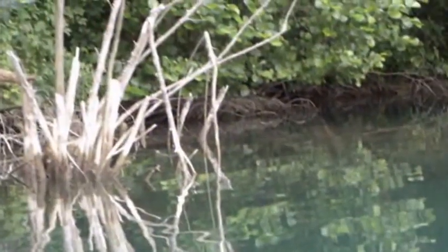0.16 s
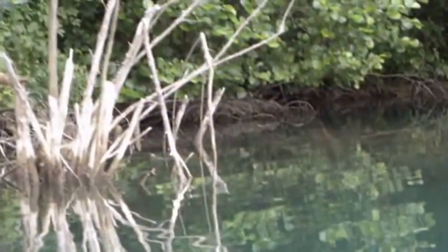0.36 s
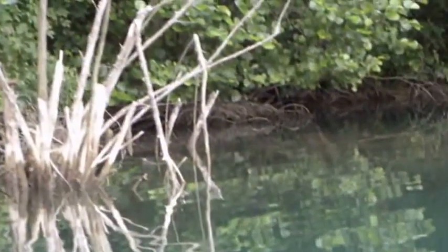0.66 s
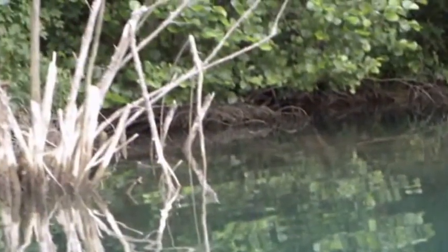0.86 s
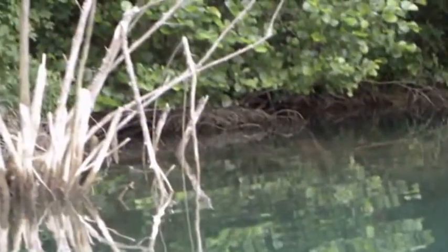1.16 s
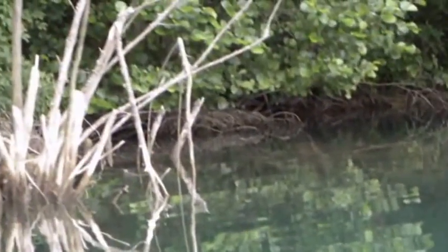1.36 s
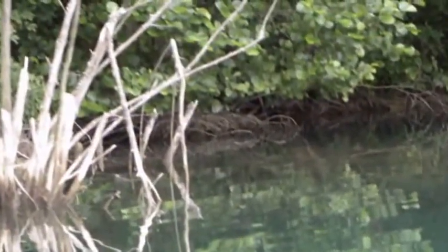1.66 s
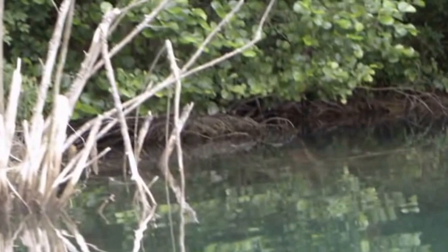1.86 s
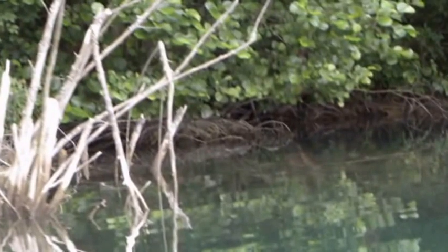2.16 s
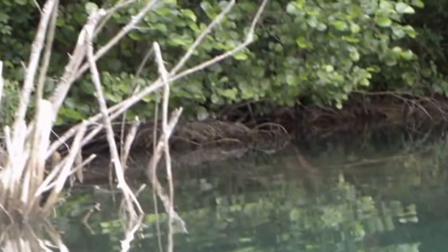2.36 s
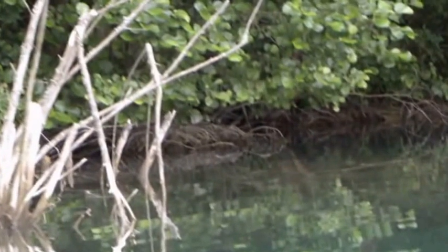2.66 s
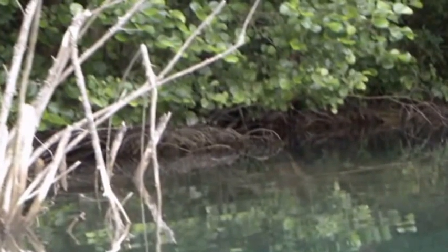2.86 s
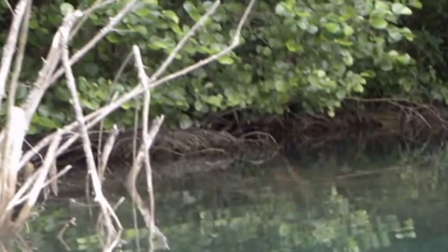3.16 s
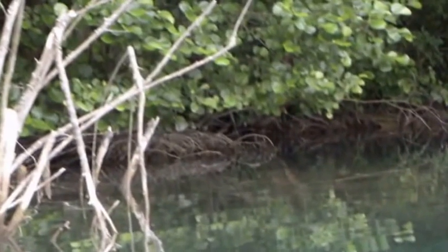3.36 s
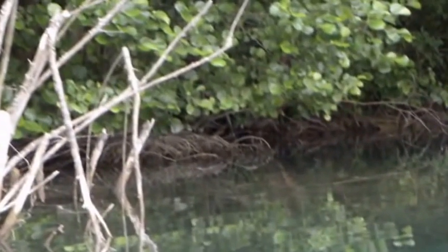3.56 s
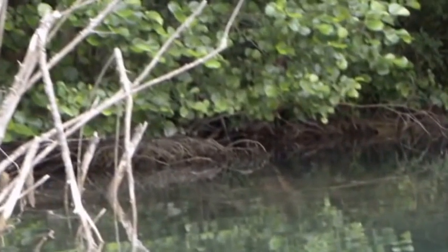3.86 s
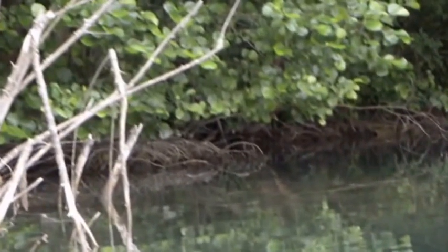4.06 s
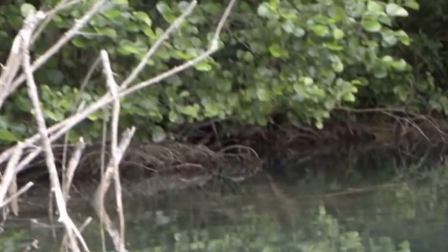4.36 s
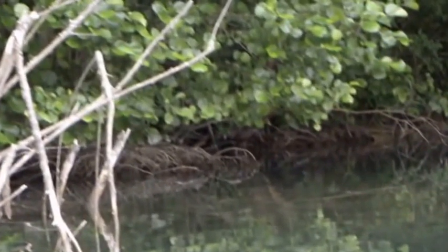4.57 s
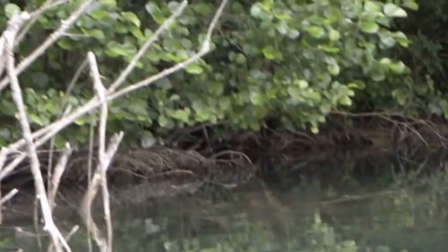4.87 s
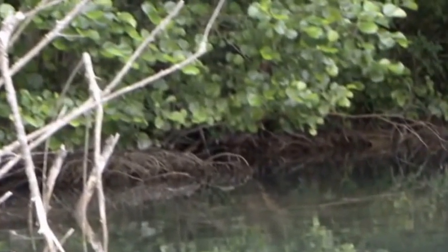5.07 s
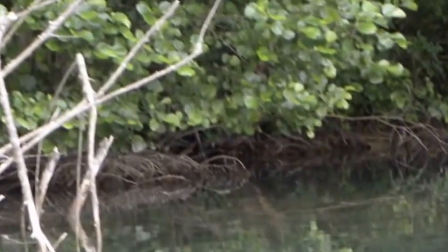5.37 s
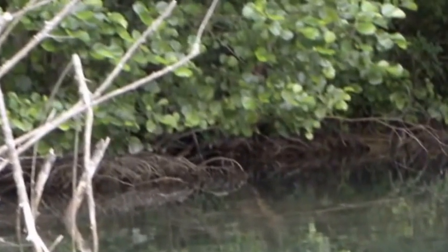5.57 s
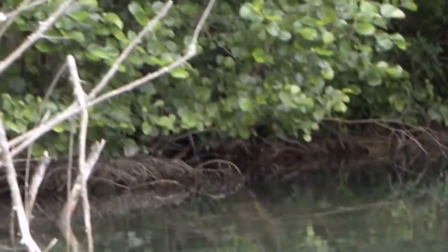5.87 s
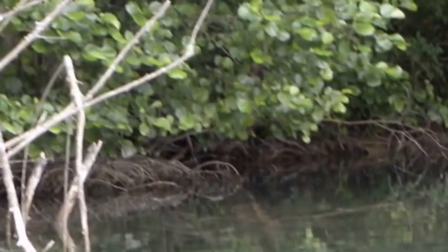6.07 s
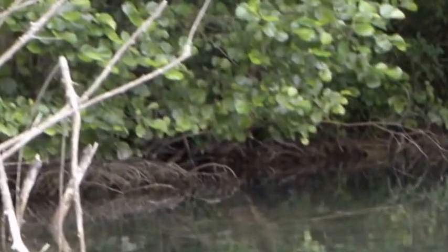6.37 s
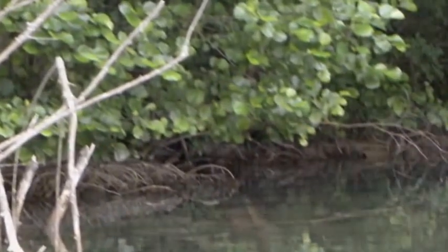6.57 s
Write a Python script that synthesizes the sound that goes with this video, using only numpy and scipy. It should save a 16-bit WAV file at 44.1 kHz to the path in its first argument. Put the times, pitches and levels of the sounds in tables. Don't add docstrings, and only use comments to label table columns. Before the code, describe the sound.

At a still, leafy waterside, several small frogs trade short creaking trills, mostly from the left, each slowing and rising slightly, over a steady far chorus. Thin bird chips tick on the left. Midway a thrush gives clear fluted whistles, then a warbler on the right repeats a fast sweeping phrase. Faint distant birds, an insect haze and soft microphone hiss lie behind.

```python
import sys
import numpy as np
from scipy import signal
from scipy.fft import rfft, irfft, next_fast_len
from scipy.io import wavfile
from scipy.ndimage import uniform_filter1d, map_coordinates

SR = 44100
rng = np.random.default_rng(int(sys.argv[2]) if len(sys.argv) > 2 else 0)


def field_ratio(decibels):
    return 10 ** (np.asarray(decibels, dtype=float) / 20)


def to_wav(sig):
    pcm = np.clip(np.atleast_2d(sig), -1, 1) * 32767
    pcm = np.round(pcm).astype(np.int16)
    wavfile.write(sys.argv[1], SR, pcm.T)


N = 296793


def along(points, hz):
    f, v = np.transpose(points)
    return np.interp(np.log(hz + 1), np.log(f + 1), v)


def panned(x, pan_db, lag=0):
    left = np.roll(x, lag) * field_ratio(pan_db / 2)
    right = x * field_ratio(-pan_db / 2)
    return np.array([left, right])


def air():
    # f/Hz, density/dB per Hz
    air_spectrum = [(20, -20.5), (60, -31), (124, -37.5), (219, -36), (489, -21.5), (908, -24), (1400, -6),
                    (2140, -16), (3670, -22.5), (5500, -30), (7000, -29.5), (11300, -36), (12100, -46.5),
                    (12250, -77.5)]
    # f/Hz, left-right correlation
    coherence = [(60, -0.13), (270, 0.84), (600, 0.97), (2600, 0.67), (5600, -0.3), (12000, -0.011)]
    m = next_fast_len(N)
    hz = np.fft.rfftfreq(m, 1 / SR)
    angle = np.arccos(np.clip(along(coherence, hz), -1, 1)) / 2
    noise = rfft(rng.standard_normal((2, m))) * field_ratio(along(air_spectrum, hz))
    mid, side = irfft(noise * [np.cos(angle), np.sin(angle)], m)[:, :N]
    return field_ratio(-32) * np.array([mid + side, mid - side]) * field_ratio([[-1.2], [1.2]])


def insects():
    # t/s, level/dB
    haze_swell = [(0, -80), (.9, -67), (2, -65), (3.1, -72.5), (4, -82.5), (6.73, -78)]
    centre_hz, width_hz, grains_per_s = 4810, 930, 38
    hz = np.fft.rfftfreq(N, 1 / SR)
    band = np.exp(-.5 * ((hz - centre_hz) / width_hz) ** 2)
    haze = irfft(rfft(rng.standard_normal((2, N))) * band, N)
    t = np.arange(N) / SR
    grain = map_coordinates(rng.standard_normal(400), [t * grains_per_s])
    level_db = np.interp(t, *np.transpose(haze_swell)) + 2.3 * grain
    return haze / haze.std() * field_ratio(level_db)


def thicket(x):
    # f/Hz, t60/s
    decay_times = [(1000, 0.33), (3000, 0.22), (7000, 0.16)]
    hz, t, z = signal.stft(rng.standard_normal((2, SR // 2)), SR, nperseg=256)
    decay = field_ratio(-60 * (t / along(decay_times, hz)[:, None]) ** 1.27)
    tail = signal.istft(z * decay, SR, nperseg=256)[1]
    return signal.fftconvolve(x, tail / np.linalg.norm(tail[0]), axes=1)[:, :N]


def bank_echoes(x):
    # t/s (delay), level/dB
    reflections = [
        (.006, -24),
        (0.062, -29),
    ]
    return sum(field_ratio(db) * np.roll(x, round(s * SR), axis=1) for s, db in reflections)


def whistle(notes, lean_db=0, flutter_db=2, rough=0, lag=0):
    out = np.zeros((2, N))
    for note in notes:
        s, hz, db = np.transpose(note)
        at = np.arange(max(round(s[0] * SR), 0), min(round(s[-1] * SR), N))
        chance = rng.standard_normal((2, 200))
        flutter, waver = (map_coordinates(c, [(at - at[0]) / 120]) for c in chance)
        pitch = uniform_filter1d(np.interp(at / SR, s, hz), size=71, mode="nearest")
        edge = np.clip(np.minimum(at - at[0], at[-1] - at) / (0.0011 * SR), 0, 1)
        level = np.interp(at / SR, s, field_ratio(db)) * field_ratio(flutter_db * flutter) * edge
        phase = 2 * np.pi * np.cumsum(pitch * (1 + rough * waver)) / SR
        tone = np.sqrt(2) * level * np.sin(phase)
        out[:, at] += panned(tone, lean_db * np.log2(pitch / 2200), lag)
    return out


def glides(rows):
    swell_s, fade_s, edge_db, ease, droop_db = 0.017, 0.026, -11.5, 1.5, -3
    notes = []
    for s, length, from_hz, to_hz, db in rows:
        t = np.linspace(0, length, num=9)
        edge = np.clip(np.minimum(t / swell_s, (length - t) / fade_s), 0, 1)
        hz = to_hz + (from_hz - to_hz) * (1 - t / length) ** ease
        level_db = db + droop_db * t / length + edge_db * (1 - edge) ** 2
        notes.append(np.transpose([s + t, hz, level_db]))
    return notes


def far_birds():
    # t/s, length/s, from f/Hz, to f/Hz, level/dB
    far_whistles = [(.6, 0.032, 2180, 2380, -50), (.785, 0.044, 3360, 3360, -54),
                    (.885, 0.042, 1665, 1664, -49), (.92, 0.055, 1880, 1630, -50),
                    (1.19, .125, 2200, 1900, -50.5), (1.29, 0.16, 2414, 1980, -50),
                    (1.63, .05, 2140, 2030, -53), (2.09, 0.034, 2130, 2100, -54),
                    (2.13, .035, 2020, 2010, -56), (4.035, 0.14, 2290, 1950, -51),
                    (5.275, 0.057, 2080, 1940, -55), (6.655, .1, 1720, 1580, -49.5),
                    (.845, 0.026, 2610, 2170, -45), (1.11, 0.068, 2540, 1940, -51.5),
                    (5.81, .025, 2260, 2250, -53), (2.958, .026, 2920, 4650, -48),
                    (2.975, 0.093, 4670, 4690, -62)]
    return whistle(glides(far_whistles), flutter_db=2.0, rough=0.0036) * field_ratio([[-3.5], [3]])


def chips():
    # t/s, length/s, knee f/Hz, last f/Hz, level/dB
    chip_calls = [
        (.759, .028, 5150, 5600, -48),
        (2.968, 0.036, 5500, 6300, -47.5),
        (4.189, .046, 5000, 6100, -47),
    ]
    # t/s, length/s, from f/Hz, to f/Hz,
    # level/dB
    upper_voices = [(-.03, .075, 6100, 5900, -63), (4.19, 0.034, 5480, 5960, -55),
                    (5.098, 0.033, 5900, 6550, -48.5), (5.108, 0.035, 5620, 6150, -48.5),
                    (6.118, .034, 5350, 6700, -48), (.78, .03, 5600, 6600, -60),
                    (2.328, 0.043, 5200, 6700, -54), (2.345, 0.033, 5500, 6100, -54),
                    (2.985, 0.022, 6000, 6500, -63)]
    flick_s, flick_from, flick_db, die_db = .008, .75, -13, -10
    notes = []
    for s, length, knee_hz, last_hz, db in chip_calls:
        climb_hz = .55 * knee_hz + .45 * last_hz
        notes.append([(s, flick_from * knee_hz, db + flick_db),
                      (s + flick_s, knee_hz, db),
                      (s + .6 * length, climb_hz, db),
                      (s + length, last_hz, db + die_db)])
    return whistle(notes + glides(upper_voices), flutter_db=2.5, rough=0.018)


def warbler():
    # t/s, f/Hz, level/dB
    intro = [
        [(4.905, 4980, -59), (4.92, 5400, -66), (4.935, 6300, -79)],
        [(4.94, 5400, -62), (4.95, 4130, -58), (4.965, 3520, -48), (4.982, 3250, -74)],
        [(5.045, 2920, -51), (5.052, 3900, -50), (5.056, 4810, -68), (5.063, 2900, -41)],
    ]
    motif = [
        [(5.266, 4840, -73), (5.28, 4490, -45), (5.31, 4255, -47), (5.335, 3630, -38.5), (5.35, 3210, -38),
         (5.37, 2490, -68)],
        [(5.383, 6310, -78), (5.395, 5560, -45), (5.403, 5040, -38), (5.412, 3730, -46), (5.425, 3086, -37),
         (5.44, 2770, -62)],
        [(5.505, 2496, -51), (5.515, 3260, -34), (5.525, 3970, -60), (5.53, 4700, -72)],
        [(5.55, 4540, -43), (5.565, 4890, -38), (5.58, 5450, -37.5), (5.592, 6830, -57)],
        [(5.597, 5300, -34), (5.605, 4350, -48), (5.62, 3730, -38), (5.638, 2867, -39)],
        [(5.645, 4450, -43), (5.655, 5040, -37), (5.67, 5510, -41), (5.69, 5410, -59)],
    ]
    flicks = [
        [(5.375, 4800, -46), (5.383, 7050, -69)],
        [(5.527, 4870, -43.5), (5.534, 2900, -36)],
    ]
    # shift t/s, change of level/dB; the earlier one lacks three notes
    earlier = [None, None, None, (-0.467, -13), (-.472, -7.5), (-.473, -10)]
    later = [(0.472, 6), (0.474, 3.5), (.477, 1.5), (0.482, 1), (.48, 2.5), (0.484, -1.5)]
    again = []
    for moves in (earlier, later):
        for note, move in zip(motif, moves):
            if move:
                again.append(np.add(note, (move[0], 0, move[1])))
    all_flicks = [np.add(note, (shift, 0, 0)) for shift in (0, .476) for note in flicks]
    return whistle(intro + motif + again + all_flicks, flutter_db=2.5, rough=0.013)


def thrush():
    # t/s, f/Hz, level/dB
    clear_notes = [
        [(2.515, 3050, -47), (2.54, 3273, -28), (2.58, 3430, -50), (2.62, 3615, -43), (2.68, 3465, -50.5),
         (2.73, 3430, -45), (2.745, 3370, -69)],
        [(3.14, 3045, -58.5), (3.155, 3017, -30), (3.2, 2972, -34.5), (3.255, 2865, -34), (3.27, 2940, -45)],
        [(3.51, 1865, -43), (3.519, 2070, -24.5), (3.524, 2104, -20), (3.54, 2130, -22), (3.553, 1997, -18.5),
         (3.558, 1810, -34.5), (3.567, 2020, -48)],
        [(3.574, 1530, -45), (3.58, 1396, -32.5), (3.595, 1500, -36.5), (3.603, 1620, -54.5)],
        [(3.598, 2513, -50.5), (3.604, 2400, -31), (3.61, 2480, -52.5)],
        [(3.611, 3340, -50.5), (3.62, 3184, -29), (3.627, 3155, -23), (3.637, 2990, -40.5)],
        [(3.74, 1880, -32), (3.75, 1997, -24.5), (3.755, 2071, -17.5), (3.785, 2031, -15.5), (3.82, 1976, -15),
         (3.86, 1944, -16.5), (3.885, 1956, -22), (3.897, 1960, -68)],
    ]
    slurred = [
        [(3.325, 4430, -72.5), (3.34, 3720, -44), (3.352, 3220, -29), (3.365, 2580, -30.5), (3.378, 2223, -29),
         (3.39, 1980, -59.5)],
        [(3.397, 3530, -57), (3.405, 3930, -46.5), (3.425, 3900, -46), (3.445, 3800, -44.5), (3.455, 3770, -81)],
        [(3.666, 2620, -50.5), (3.672, 2540, -31.5), (3.682, 2364, -30.5), (3.692, 2355, -50.5)],
        [(3.64, 3780, -57.5), (3.655, 4130, -53.5), (3.67, 3960, -55.5)],
    ]
    t = np.arange(N) / SR
    stutter = np.cos(np.pi * (t - 2.539) / .0195) ** 2
    depth = np.clip((2.64 - t) / 0.0087, 0, 1)
    notes = whistle(clear_notes, lean_db=8, flutter_db=.15, lag=1)
    slurs = whistle(slurred, lean_db=7, flutter_db=5, lag=1, rough=.016)
    return notes * (1 - depth + depth * stutter) + slurs


def pulses(s, db, hz, rise, fall):
    t = np.arange(-400, 900) / SR
    shape = 2 / (np.exp(-t / rise) + np.exp(t / fall)) * signal.windows.tukey(len(t), .3)
    phase = rng.uniform(0, 2 * np.pi, (len(s), 1))
    ring = field_ratio(db)[:, None] * shape * np.sin(2 * np.pi * hz[:, None] * t + phase)
    at = np.round(s * SR).astype(int)[:, None] + np.round(t * SR).astype(int) + SR
    return np.bincount(at.ravel(), ring.ravel(), N + 3 * SR)[SR:SR + N]


def croaks(s, low_db, high_db, hz, top_db, low_pan_db, high_pan_db, lag):
    low_hz = 1385 + .16 * (hz - 2800) + 45 * rng.standard_normal(len(s))
    top_hz = hz * rng.uniform(1.45, 1.7, len(s))
    low = pulses(s, low_db, low_hz, rise=.00062, fall=.0016)
    high = pulses(s, high_db, hz, rise=0.0005, fall=0.0018)
    top = pulses(s, top_db, top_hz, rise=.0004, fall=0.0013)
    return panned(low, low_pan_db, lag) + panned(high + top, high_pan_db, lag)


def far_frogs(count=16):
    # t/s, level/dB
    chorus_swell = [(0, -42), (1, -46.5), (1.9, -47), (2.8, -43), (4, -46.5), (4.8, -46.5), (6.73, -47)]
    when, strength = np.transpose(chorus_swell)
    along_call = np.linspace(0, 1, num=15)
    offsets = np.cumsum(.023 + .031 * along_call)
    out = 0
    for turn, (start, pace, size, side, loudness) in enumerate(rng.uniform(-1.1, 1, (count, 5))):
        first = 1.7 * ((turn + .4 * start) / count - 1)
        calls = np.arange(first, N / SR, 1.7 + .05 * pace)
        s = (calls[:, None] + offsets * (1 + .12 * pace)).ravel()
        keep = (s > 0) & (s < N / SR)
        u = np.tile(along_call, len(calls))[keep]
        s = s[keep]
        db = 5 * loudness + 4 * u + 2.5 * rng.standard_normal(len(s))
        hz = 2610 + 170 * size + 380 * u + 70 * rng.standard_normal(len(s))
        db = db + np.interp(s, when, strength)
        pan_db = -2.1 + 8 * side
        out = out + croaks(s, db - 10.5, db, hz, db - 27, pan_db, pan_db, lag=round(-4 * side))
    return out


def frog(calls, growth, voice, seat, closing=(), count=18):
    high_db, ring_hz, hz_per_ms, db_per_ms, low_db = voice
    low_pan_db, high_pan_db, top_db = seat
    s, short_ms, db = [], [], []
    for first, gap, longest, last, peak_db in calls:
        gaps = np.minimum(gap * growth ** np.arange(count), longest)
        at = first + np.cumsum(gaps) - gaps
        sung = at < last + .015
        s += [*at, *(at[sung][-1] + np.cumsum(closing))]
        short_ms += [*(1000 * (longest - gaps)), *np.zeros(len(closing))]
        db += [*np.where(sung, peak_db, -200), *np.full(len(closing), peak_db - 1.5)]
    s, short_ms, chance = np.array(s), np.array(short_ms), rng.standard_normal((3, len(s)))
    db = db - db_per_ms * short_ms
    hz = ring_hz - hz_per_ms * short_ms + 90 * chance[0]
    low_db = db + low_db + 1.1 * chance[1]
    high_db = db + high_db + 1.6 * chance[2]
    lag = -2 if high_pan_db > 0 else 2
    return croaks(s, low_db, high_db, hz, db + top_db, low_pan_db, high_pan_db, lag=lag)


def near_frogs():
    # first pulse t/s, first gap t/s, longest gap t/s, last pulse t/s, peak level/dB
    big_frog = [(-.028, .054, .054, .08, -33), (1.0195, .0217, .0539, 1.552, -28),
                (3.0295, .022, .0533, 3.564, -29), (4.9872, .0233, .055, 5.495, -28.5)]
    steady_frog = [(-.0063, .02955, .0475, .473, -33), (2.376, .0266, .046, 2.954, -36),
                   (4.4957, .0264, .045, 4.931, -37), (6.3038, .0264, .0468, 6.695, -34)]
    hasty_frog = [(.689, .0278, .05, 1.064, -33), (1.867, .0296, .05, 2.214, -35),
                  (3.522, .0339, .051, 3.811, -35), (5.755, .0294, .049, 6.099, -33)]
    slow_frog = [(.373, .051, .06, .77, -33), (2.1205, .0555, .061, 2.358, -34),
                 (3.577, .049, .054, 3.89, -31), (5.112, .051, .061, 5.512, -33)]
    thin_frogs = [(1.2187, .041, .0483, 1.54, -31), (1.415, .045, .045, 1.685, -33),
                  (3.423, .0208, .045, 3.66, -33), (4.046, .0415, .051, 4.43, -34),
                  (4.02, .04, .054, 4.507, -37), (5.545, .043, .0478, 5.915, -33),
                  (6.174, .0405, .049, 6.539, -30), (6.24, .047, .051, 6.489, -35),
                  (1.694, .047, .052, 1.839, -37)]
    hurry = [.042, .037]
    slowing = [1.085, 1.058, 1.065, 1.045, 1.05]
    # high ring level/dB, its f/Hz at the longest gap, fall of f/Hz and of level/dB per ms of
    # shorter gap, low ring level/dB
    voices = [
        (-2, 2872, 10, .3, -0.6),
        (-0.15, 2867, 22, 0.28, -1.43),
        (0.22, 2976, 12, 0.27, -4.5),
        (.1, 2900, 10, .1, -9),
        (.1, 2820, 10, 0.17, -11.5),
    ]
    # low ring left-right level/dB, high ring left-right level/dB, top ring level/dB
    seats = [
        (-1, 7.5, -32),
        (-3, 7.5, -28.5),
        (-3, 6, -31),
        (-3, 0, -26),
        (-6.5, -2, -22),
    ]
    # t/s, peak level/dB
    strays = [(.045, -36), (1.563, -31.5), (3.011, -39), (5.53, -32.5), (.788, -38), (3.703, -30.5),
              (5.986, -45)]
    callers = [big_frog, steady_frog, hasty_frog, slow_frog, thin_frogs]
    closings = [(), (), hurry, (), ()]
    out = sum(frog(*caller) for caller in zip(callers, slowing, voices, seats, closings))
    s, db = np.transpose(strays)
    hz = 2850 + 80 * rng.standard_normal(len(s))
    return out + croaks(s, db - 5, db, hz, db - 26, 0, 3, lag=-2)


def scene():
    near, far, song = near_frogs(), far_frogs(), thrush()
    right = warbler() * field_ratio([[-2.5], [2.5]])
    left = chips() * field_ratio([[4], [-4.5]])
    distant = far_birds()
    birds = right + left
    direct = near + far + song + birds + bank_echoes(birds) + distant
    scattered = field_ratio(-1.5) * right + field_ratio(-3.5) * left + field_ratio(-26.5) * song
    scattered = scattered + field_ratio(-11) * near + field_ratio(-6) * far + field_ratio(-8) * distant
    return direct + thicket(scattered) + air() + insects()


def roll_off(x):
    return signal.sosfilt(signal.butter(12, 12600, fs=SR, output="sos"), x)


def record(dry):
    offset = .0005 * np.clip((N - np.arange(N)) / 2000, 0, 1)
    return roll_off(dry - offset)


dry = scene()
out = record(dry)
to_wav(out)
```